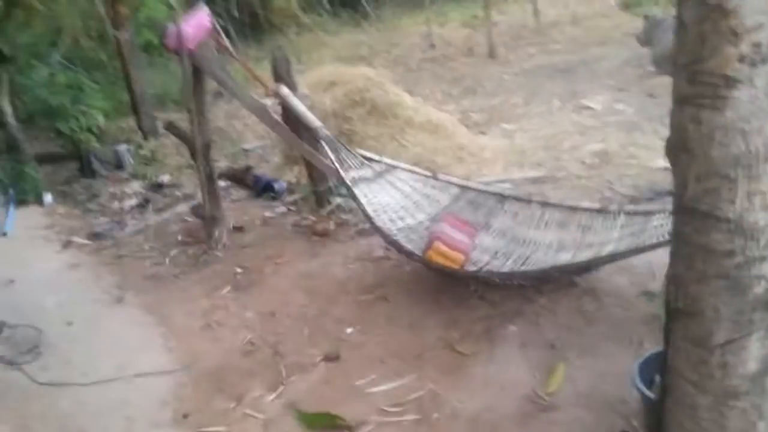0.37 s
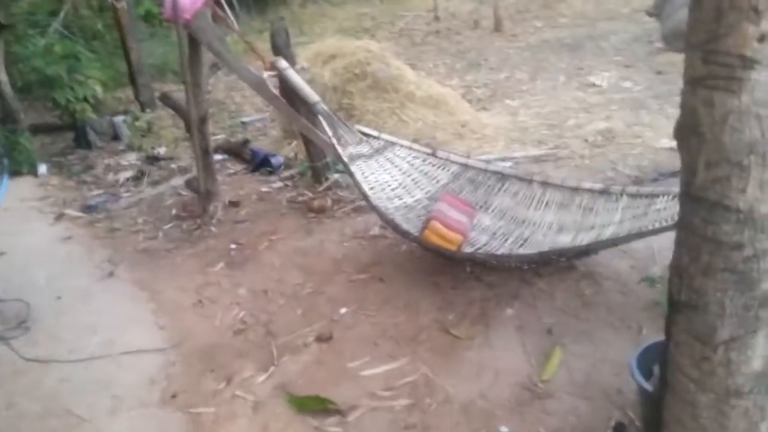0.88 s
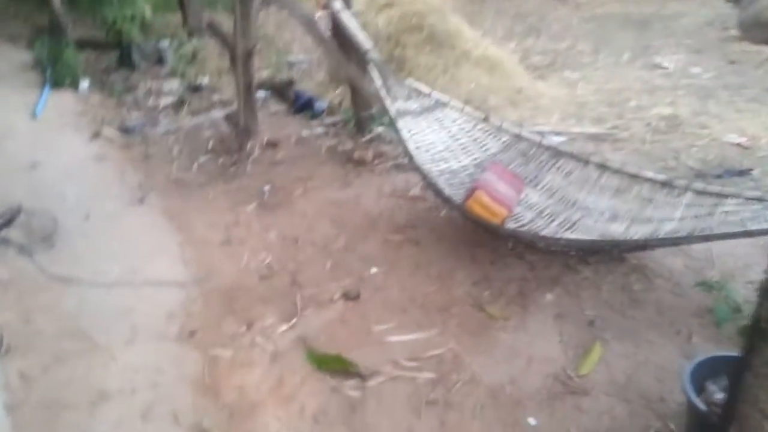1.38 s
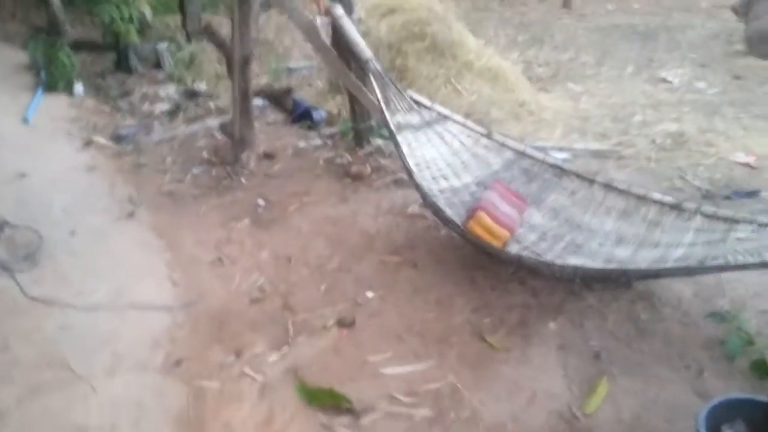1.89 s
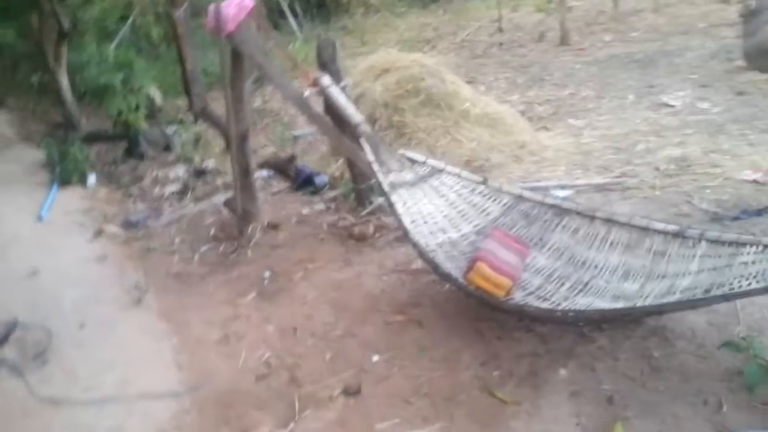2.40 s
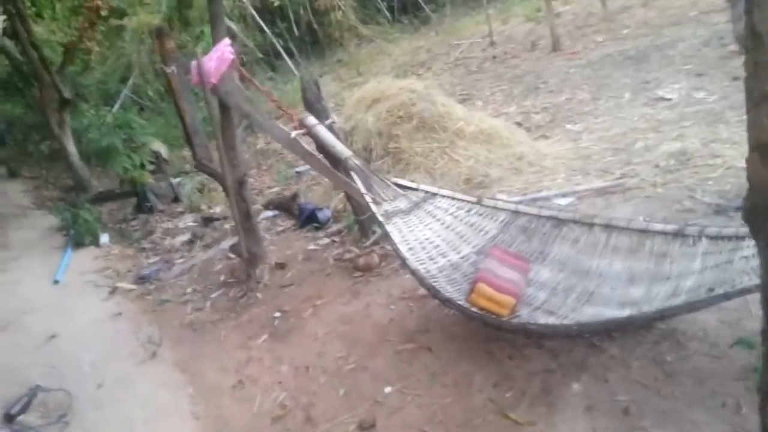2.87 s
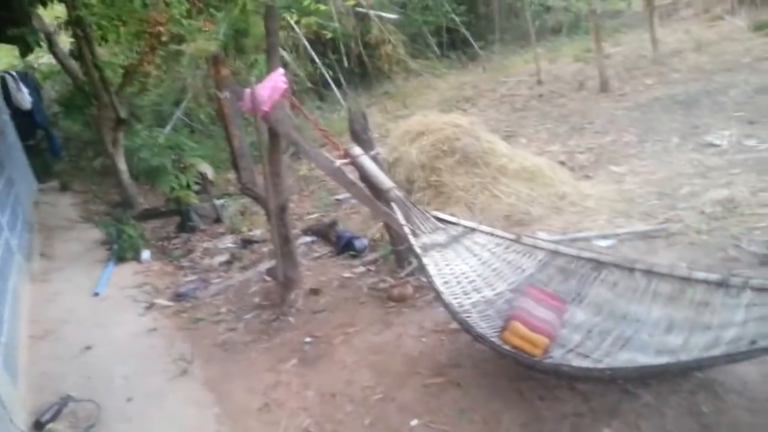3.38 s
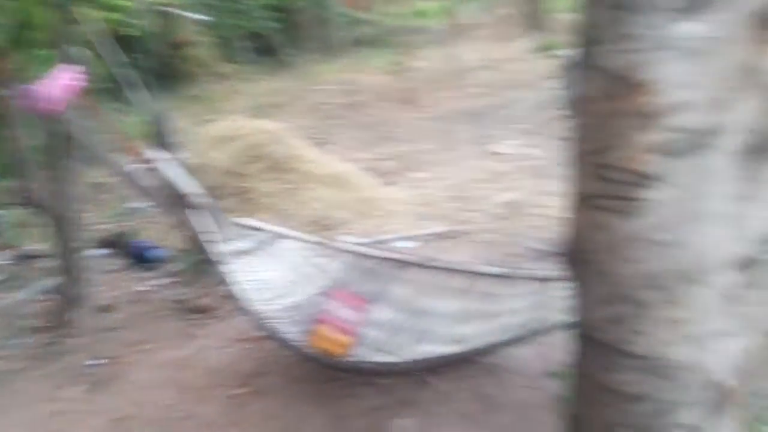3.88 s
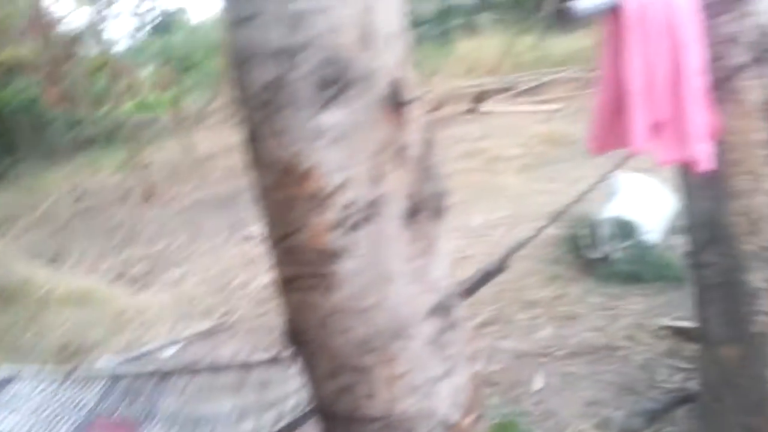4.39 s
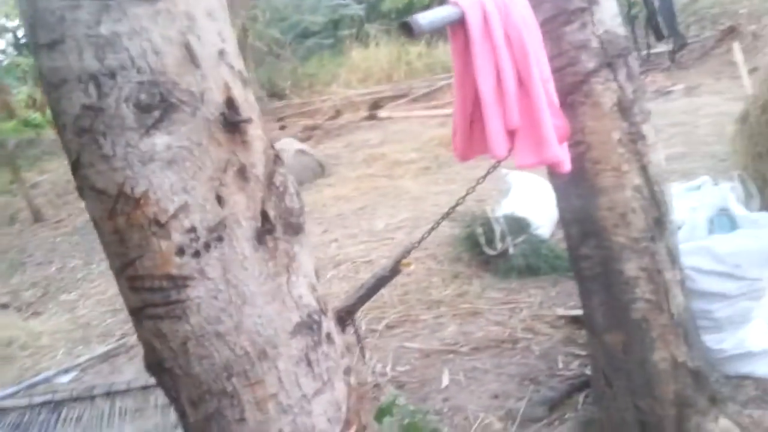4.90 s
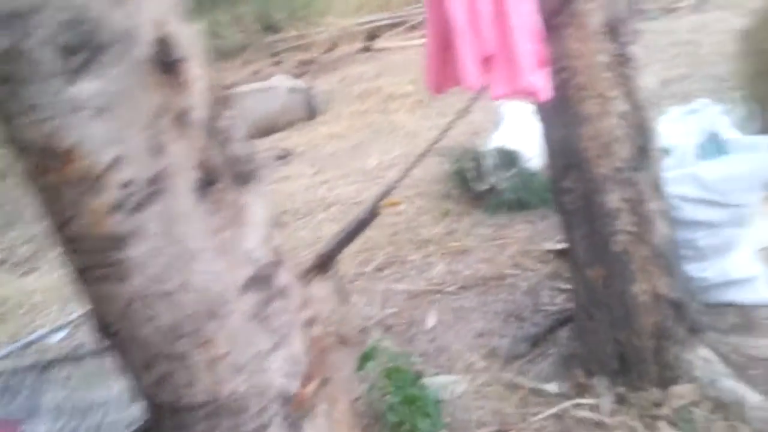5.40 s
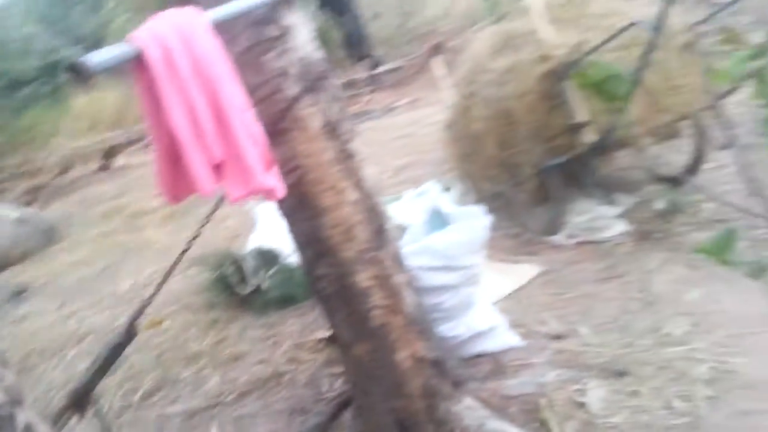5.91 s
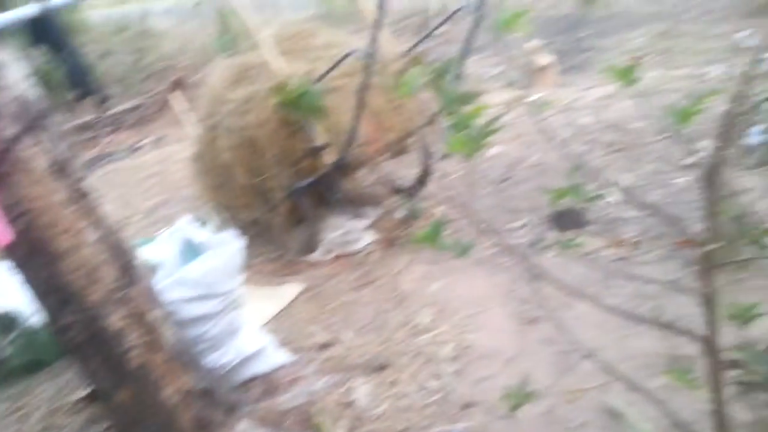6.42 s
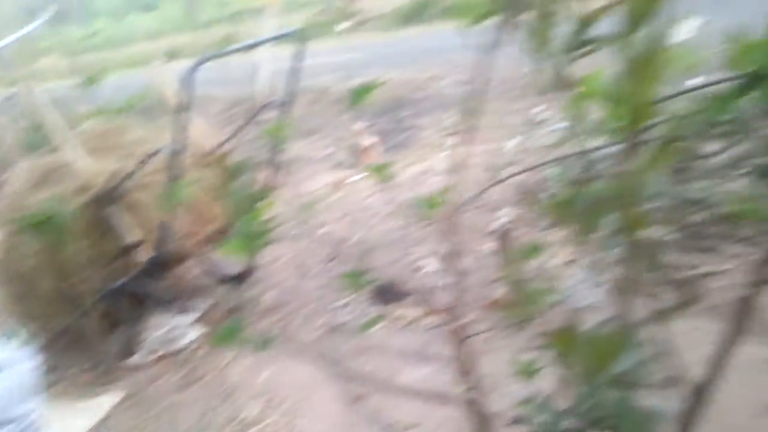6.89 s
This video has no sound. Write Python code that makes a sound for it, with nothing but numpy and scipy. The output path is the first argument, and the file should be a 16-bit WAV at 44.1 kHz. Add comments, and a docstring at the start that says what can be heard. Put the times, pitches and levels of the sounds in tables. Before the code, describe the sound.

Outdoors on dry open ground, close to a small stereo microphone with a quiet, steady airy hiss. From 0 to 0.8 s, soles drag and grind over grit and straw in a dense, overlapping crunch, with brittle twig ticks near 0.1 s and a hard, loud snap at about 0.64 s. A small click follows at 1.0 s. Between 1.1 and 2.5 s the movement is softer: light rustles, small scrapes, dull heel knocks. Firmer crunches come at 2.6 and 3.1 s, then a very crisp bright one at 3.5 s and a woody knock at 3.8 s. Scattered gritty steps continue from 4.3 s, swishing straw around 5.15 s, another crunch at 5.7 s, and quicker shuffles from 6.1 to 7 s. Distant birds give short falling cheeps and thin whistles, mostly after 1 s. A barely audible low tone wavers around 1.8-2.9 s and 4.6-5.5 s.

```python
"""Shuffling on gritty earth

Soles drag, crush grit and stir straw close by: filtered noise with grain bursts and short stone rings. Sharp
close snaps and dull heel knocks are struck decaying sines, heard through two small microphone ports. Far birds
cheep and whistle and a faint low tone comes and goes: gliding sines with wavering level. A quiet band-shaped
noise, the hiss of open country, lies under all."""
import sys
import numpy as np
from scipy import signal
from scipy.io import wavfile

SR = 44100
rng = np.random.default_rng(int(sys.argv[2]) if len(sys.argv) > 2 else 0)


def amplitude_ratio(level_db):
    """Convert a level in decibels to the matching linear amplitude (field) ratio."""
    exponent = np.asarray(level_db, float) / 20
    return 10 ** exponent


def generate_wav(signal):
    """Clip the signal to [-1, 1] and save it as 16-bit WAV at the path in sys.argv[1]."""
    frames = np.transpose(np.atleast_2d(signal))
    scaled = np.clip(frames, -1, 1) * 32767
    pcm = np.round(scaled).astype(np.int16)
    wavfile.write(sys.argv[1], SR, pcm)


N = 310023

BAND_EDGES_HZ = 40 * 2 ** (np.arange(27) / 3)
RIGHT_LAG_S = 0.00023
# likeness of the ports in noise: f/Hz, left-right correlation/1
LIKENESS = [(60, 0.82), (300, 0.57), (700, 0.63), (1400, 0.13), (3000, 0.0)]

# air spectrum: f/Hz, relative density/dB per Hz
AIR_SPECTRUM = [(41, -48), (70, -24), (110, -18), (160, -11), (295, -0.5), (395, -10.5), (494, -4),
                (2330, -5.5), (2980, -4), (3990, -8.5), (13100, -12), (15000, -11)]
AIR_RMS_DB = -63.5

# weight pressing the ground: peak t/s, level in lowest region/dB, 10 dB rise/s, 10 dB fall/s
PRESSES = [(0.01, -64, 0.02, 0.04), (0.098, -54.0, 0.016, 0.199), (0.287, -47.5, 0.09, 0.115),
           (0.571, -52.5, 0.034, 0.108), (0.631, -51.0, 0.004, 0.018), (0.805, -60.5, 0.007, 0.106),
           (1.014, -54.0, 0.054, 0.015), (1.38, -55.5, 0.165, 0.015), (1.617, -59.0, 0.027, 0.015),
           (1.676, -60.5, 0.119, 0.2), (1.723, -48.5, 0.02, 0.022), (2.018, -57.5, 0.2, 0.048),
           (2.094, -60.5, 0.005, 0.076), (2.167, -58.5, 0.017, 0.033), (2.274, -52.5, 0.024, 0.095),
           (2.446, -62.0, 0.092, 0.2), (2.625, -50.0, 0.063, 0.052), (2.885, -66.5, 0.007, 0.021),
           (3.0, -62, 0.015, 0.025), (3.128, -51.5, 0.066, 0.024), (3.207, -64.0, 0.068, 0.025),
           (3.508, -50.0, 0.014, 0.043), (3.55, -50.5, 0.044, 0.027), (3.705, -60.0, 0.069, 0.12),
           (3.821, -50.0, 0.005, 0.021), (3.855, -61.0, 0.148, 0.015), (4.112, -56.0, 0.021, 0.025),
           (4.213, -67.5, 0.039, 0.02), (4.326, -53.0, 0.004, 0.041), (4.403, -57.0, 0.02, 0.057),
           (4.83, -56.0, 0.054, 0.066), (5.234, -58.5, 0.039, 0.044), (5.296, -60.0, 0.053, 0.036),
           (5.349, -66.0, 0.023, 0.015), (5.49, -64.5, 0.028, 0.019), (5.635, -60, 0.015, 0.03),
           (5.721, -47.5, 0.031, 0.031), (5.851, -53.5, 0.005, 0.029), (6.105, -64.5, 0.069, 0.017),
           (6.155, -54.0, 0.013, 0.132), (6.24, -58, 0.03, 0.03), (6.305, -58, 0.01, 0.03),
           (6.45, -57.0, 0.005, 0.145), (6.56, -60, 0.01, 0.025), (6.654, -52.0, 0.021, 0.021),
           (6.782, -64.0, 0.015, 0.028), (6.927, -50.0, 0.031, 0.048), (6.99, -59, 0.015, 0.03)]
# sole dragging on packed earth: peak t/s, level in scrape region/dB, 10 dB rise/s, 10 dB fall/s,
# resonance f/Hz
DRAGS = [(0.175, -44.0, 0.039, 0.027, 1690), (0.215, -47.0, 0.002, 0.156, 1540),
         (0.279, -42.5, 0.021, 0.019, 1760), (0.308, -40.0, 0.029, 0.025, 1880),
         (0.37, -50.5, 0.003, 0.108, 1580), (0.555, -49.0, 0.033, 0.169, 1720),
         (0.644, -48.5, 0.023, 0.016, 1380), (0.682, -51.5, 0.002, 0.022, 1610),
         (0.98, -60.0, 0.013, 0.053, 1570), (1.24, -56.5, 0.021, 0.013, 1550),
         (1.288, -57.0, 0.002, 0.036, 1840), (1.359, -59.0, 0.023, 0.031, 1340),
         (1.687, -60.0, 0.088, 0.2, 1310), (1.723, -53.0, 0.018, 0.014, 1300),
         (1.794, -53.0, 0.004, 0.012, 1830), (1.966, -56.0, 0.004, 0.012, 1360),
         (2.015, -58.0, 0.006, 0.029, 1330), (2.203, -59.5, 0.049, 0.039, 1500),
         (2.281, -49.5, 0.004, 0.022, 1330), (2.335, -56.5, 0.061, 0.148, 1450),
         (2.636, -47.5, 0.028, 0.025, 1450), (3.069, -53.5, 0.036, 0.033, 1330),
         (3.118, -50.5, 0.004, 0.012, 1300), (3.219, -64.5, 0.023, 0.013, 1290),
         (3.546, -53.5, 0.023, 0.024, 1320), (3.757, -55.5, 0.015, 0.012, 1540),
         (3.825, -50.0, 0.005, 0.015, 1220), (4.11, -60, 0.015, 0.02, 1430),
         (4.319, -55.5, 0.004, 0.024, 1430), (4.391, -48.0, 0.003, 0.012, 1390),
         (5.181, -51.5, 0.035, 0.012, 1780), (5.298, -53.5, 0.004, 0.023, 1750),
         (5.713, -46.5, 0.004, 0.036, 1300), (6.074, -59.5, 0.006, 0.029, 1650),
         (6.148, -46.5, 0.004, 0.08, 1310), (6.24, -54, 0.02, 0.03, 1360),
         (6.457, -51.5, 0.006, 0.034, 1320), (6.552, -56.0, 0.002, 0.035, 1330),
         (6.645, -48.0, 0.004, 0.023, 1300), (6.771, -51.0, 0.004, 0.02, 1630),
         (6.893, -44.0, 0.006, 0.012, 1400), (6.986, -54.5, 0.075, 0.02, 1580)]
# sole crushing grit: peak t/s, level in grit region/dB, 10 dB rise/s, 10 dB fall/s, resonance f/Hz
CRUSHES = [(0.107, -41.5, 0.006, 0.024, 2450), (0.177, -37.5, 0.032, 0.015, 2760),
           (0.273, -41.0, 0.049, 0.186, 3330), (0.306, -38.5, 0.06, 0.033, 3450),
           (0.378, -45, 0.006, 0.02, 3290), (0.436, -47.5, 0.164, 0.025, 3210),
           (0.561, -40.5, 0.028, 0.061, 2690), (0.617, -43.0, 0.04, 0.053, 3480),
           (0.706, -46.5, 0.076, 0.028, 4980), (0.741, -47.5, 0.017, 0.016, 2410),
           (0.829, -49.5, 0.046, 0.019, 4220), (0.96, -48.5, 0.013, 0.015, 5410),
           (1.011, -51.5, 0.127, 0.029, 5250), (1.18, -56.0, 0.042, 0.02, 4070),
           (1.249, -49.5, 0.071, 0.082, 4530), (1.387, -57.5, 0.2, 0.017, 3670),
           (1.595, -59.5, 0.054, 0.097, 3450), (1.649, -50.5, 0.006, 0.092, 4670),
           (1.728, -55.5, 0.028, 0.025, 3290), (1.785, -55.5, 0.015, 0.015, 2630),
           (1.883, -55.0, 0.093, 0.052, 5630), (1.968, -52, 0.003, 0.03, 5200),
           (1.985, -45.5, 0.016, 0.037, 4360), (2.029, -52.5, 0.038, 0.021, 4620),
           (2.215, -56.5, 0.089, 0.026, 2520), (2.289, -55.0, 0.09, 0.098, 3010),
           (2.348, -58.0, 0.03, 0.02, 4310), (2.442, -66.0, 0.006, 0.067, 2880),
           (2.614, -43.5, 0.032, 0.033, 4160), (2.719, -62.0, 0.033, 0.025, 2770),
           (2.953, -58.0, 0.007, 0.117, 4770), (3.066, -47.5, 0.042, 0.018, 4640),
           (3.112, -41.0, 0.056, 0.049, 4790), (3.443, -57.0, 0.016, 0.033, 4330),
           (3.486, -46.5, 0.021, 0.024, 4430), (3.511, -32.5, 0.009, 0.017, 4350),
           (3.545, -42.5, 0.015, 0.032, 4810), (3.576, -45.5, 0.005, 0.041, 4840),
           (3.715, -51.0, 0.043, 0.073, 5260), (3.764, -51.0, 0.029, 0.019, 4000),
           (3.834, -53.0, 0.022, 0.051, 5030), (4.101, -53.5, 0.022, 0.036, 4810),
           (4.315, -55.5, 0.006, 0.13, 3620), (4.403, -45.0, 0.015, 0.033, 4040),
           (4.517, -45.0, 0.034, 0.026, 5380), (4.695, -61.5, 0.006, 0.129, 4220),
           (4.794, -50.5, 0.014, 0.057, 3750), (4.828, -44.0, 0.037, 0.036, 4370),
           (4.873, -56.0, 0.006, 0.022, 3390), (4.943, -58.0, 0.013, 0.022, 2780),
           (5.104, -52.0, 0.003, 0.092, 4090), (5.137, -44.5, 0.015, 0.075, 4850),
           (5.172, -46.5, 0.025, 0.06, 4650), (5.203, -45.0, 0.034, 0.043, 4630),
           (5.299, -52.0, 0.014, 0.046, 2790), (5.448, -58.0, 0.029, 0.187, 3180),
           (5.482, -56, 0.03, 0.035, 3900), (5.648, -44.0, 0.024, 0.025, 5230),
           (5.67, -49.5, 0.028, 0.015, 4750), (5.687, -50.5, 0.028, 0.133, 4180),
           (5.703, -40.0, 0.003, 0.034, 4300), (5.861, -52.5, 0.015, 0.044, 3110),
           (6.005, -65.0, 0.022, 0.107, 3000), (6.092, -54.5, 0.023, 0.023, 4250),
           (6.171, -47.5, 0.022, 0.078, 4850), (6.211, -48.0, 0.006, 0.089, 4660),
           (6.24, -45.0, 0.024, 0.035, 4660), (6.4, -58.5, 0.131, 0.037, 3120),
           (6.459, -55.5, 0.018, 0.077, 2790), (6.556, -51, 0.003, 0.03, 4040),
           (6.571, -47.0, 0.02, 0.04, 3890), (6.651, -43.5, 0.005, 0.034, 3980),
           (6.684, -54.0, 0.003, 0.017, 4030), (6.773, -54.5, 0.013, 0.101, 2680),
           (6.895, -46.0, 0.017, 0.038, 3890), (6.956, -48.0, 0.006, 0.089, 4160)]
# loose straw swishing: peak t/s, level in top region/dB, 10 dB rise/s, 10 dB fall/s
SWISHES = [(0.244, -45.0, 0.019, 0.126), (0.328, -47.0, 0.047, 0.014), (0.547, -53.5, 0.017, 0.066),
           (0.614, -49.5, 0.062, 0.03), (0.701, -52.5, 0.053, 0.018), (0.793, -55.5, 0.006, 0.057),
           (0.973, -57.0, 0.078, 0.06), (1.229, -54.0, 0.014, 0.025), (1.599, -61.5, 0.015, 0.013),
           (1.673, -55.5, 0.03, 0.029), (1.858, -59.0, 0.016, 0.065), (1.968, -52.5, 0.002, 0.042),
           (2.013, -55.0, 0.022, 0.027), (2.216, -63.5, 0.005, 0.051), (3.101, -49.5, 0.048, 0.031),
           (3.202, -62.5, 0.023, 0.023), (3.486, -55.5, 0.013, 0.019), (3.588, -56.0, 0.018, 0.049),
           (3.709, -52.0, 0.02, 0.039), (3.833, -50.5, 0.005, 0.028), (4.535, -59.0, 0.02, 0.021),
           (4.845, -53.0, 0.007, 0.018), (5.103, -52.0, 0.002, 0.074), (5.13, -48.0, 0.006, 0.066),
           (5.174, -46.0, 0.025, 0.022), (5.308, -61.0, 0.015, 0.023), (5.664, -57.0, 0.022, 0.018),
           (6.191, -59.0, 0.019, 0.031), (6.556, -52.5, 0.003, 0.06), (6.58, -52.0, 0.003, 0.015),
           (6.91, -60.0, 0.007, 0.024), (6.957, -50.0, 0.004, 0.114)]
# limits between weight, scrape, grit and straw regions: f/Hz
REGION_EDGES_HZ = [1050, 2100, 7000]
# stirred by a crush: level re grit at a middling crush/dB, loss per dB of crush/dB
WEIGHT_LAW, SCRAPE_LAW, STRAW_LAW = (-15, 0.4), (-8.5, 0.2), (-6.5, 0.3)
MIDDLING_CRUSH_DB = -50
# base spectrum of the feet: f/Hz, relative density/dB per Hz
CRUNCH_SPECTRUM = [(24, -63), (40, -19), (125, -18.5), (466, -1), (824, -0.5), (1290, -4.5), (2520, -3),
                   (4230, -5), (12900, -11.5), (15000, -28)]
GRIT_PEAK_DB, GRIT_WIDTH_OCTAVES = 6.0, 0.3
SCRAPE_PEAK_DB, SCRAPE_WIDTH_OCTAVES = 5.0, 0.25
GRAINS_PER_S, GRAIN_DECAY_S, GRAIN_SPREAD_DB, SMOOTH_SHARE = 700, 0.0018, 2.5, 0.9
PEBBLES_PER_S, PEBBLE_T60_CYCLES, PEBBLE_DB = 25, 27, -11    # rate per band
# place of the feet in the treble: t/s, left-right/dB
FEET_PAN = [(0.05, 3), (0.12, 12), (0.23, 0), (0.31, -4), (0.47, 7), (0.72, 1), (1.1, 3.5), (2.62, 4),
            (2.8, 0), (3.11, 8), (3.3, 2), (3.45, 6.5), (4.29, 2), (4.8, 3), (5.07, -3.5), (5.38, 3),
            (6.77, 2.5), (7.03, -6)]
# how far lower bands follow that place: t/s, share/1
MIDDLE_FOLLOWS = [(0.6, 1.1), (1.0, 0.3), (3.0, 0.15)]

# sharp close snaps: t/s, level/dB, dull modes/dB, bright modes/dB, left-right/dB
SNAPS = [(0.1031, -28, 0.0, -14.0, 9), (0.106, -24, 1.5, -14.0, 16), (.1075, -30.5, 9.5, -10.5, 9),
         (.1180, -25.5, -8, -22, 21), (0.125, -24, 2, -13, 6.5), (0.3795, -29, 4.5, -13, 26),
         (0.6362, -11, 5.5, -3, 13), (0.655, -18.5, 5.5, -6, -5), (1.0032, -20, -16, -3, 8),
         (1.0049, -26, 0, -10, 3), (3.4974, -37, -10.0, 10, 2), (3.5012, -31, -10.0, 3, 4)]
# snap modes: f/Hz, level re snap/dB, t60/s (ring() floors it at 1 ms)
SNAP_MODES = [(523, -36, 0.023), (1245, -13.5, .010), (1860, -6, 0.0039), (2900, 3.5, 0.0013),
              (4580, 1, 0.001), (7300, 4.5, 0.00086), (9700, -14, 0.00067)]

# cheeps whose pitch moves at once, then levels out: t/s, length/s, from f/Hz, to f/Hz, level/dB
CHEEPS = [(1.22, .07, 3450, 3090, -51), (1.74, .05, 3260, 3020, -54), (4.335, .08, 3750, 3260, -51),
          (4.79, .07, 3560, 2930, -48), (5.45, .07, 3500, 2880, -50), (6.36, .06, 3170, 2860, -55),
          (6.65, .03, 2800, 2960, -53), (6.885, .035, 3150, 2920, -56)]
# thin even slides of the same bird: t/s, length/s, from f/Hz, to f/Hz, level/dB
SLIDES = [(2.1, .1, 3620, 3390, -65), (4.15, .11, 3110, 3250, -74), (4.308, .03, 3980, 3750, -58),
          (4.405, .042, 3280, 2880, -53), (4.7, .092, 4040, 3520, -58), (5.41, .045, 3750, 3470, -61),
          (5.51, .05, 2900, 2690, -61), (6.29, .07, 3700, 3200, -62)]
# second, lower whistler: t/s, length/s, from f/Hz, to f/Hz, level/dB
WHISTLES = [(1.1, .085, 2860, 2530, -68), (1.33, .35, 2530, 2920, -72), (1.775, .037, 2300, 1640, -55),
            (1.82, .13, 2900, 3030, -72), (2.1, .08, 2880, 2500, -66), (2.32, .25, 1590, 1550, -66),
            (2.65, .09, 2890, 2540, -69), (3.04, .09, 1310, 1280, -56), (3.13, .08, 2860, 2520, -62),
            (3.84, .08, 2750, 2520, -70), (4.35, .08, 2850, 2490, -60)]

# heel knocks: t/s, level/dB, f/Hz, t60/s
KNOCKS = [(1.349, -48.5, 500, 0.067), (1.718, -36, 610, 0.022), (2.013, -45.5, 483, 0.024),
          (2.284, -41.5, 533, 0.048), (2.995, -42.5, 342, 0.022), (3.094, -45, 477, 0.045),
          (3.821, -31, 646, 0.037), (4.322, -41.5, 623, 0.025), (5.633, -50, 727, 0.047),
          (5.854, -37.5, 457, 0.02), (6.3, -47.5, 762, 0.06), (6.455, -43.5, 786, 0.06)]
BLOW_HIGHPASS_HZ = 256

# low tone: t/s, length/s, from f/Hz, to f/Hz, level/dB
LOW_TONE = [(1.75, 1.15, 293, 293, -70), (4.55, .5, 290, 289, -72.5), (5.1, .45, 287, 286, -68)]


def rms_one(x):
    """Scale to rms 1."""
    return x / np.sqrt(np.mean(x ** 2) + 1e-20)


def slow_times():
    """Time in s at every 32nd sample, the slow control rate."""
    return np.arange(0, N + 32, 32) / SR


def in_time(rows):
    """Curve in time, read at the slow rate."""
    s, value = np.transpose(rows)
    return np.interp(slow_times(), s, value)


def full_rate(slow):
    """From every 32nd sample to every sample."""
    return np.interp(np.arange(N) / 32, np.arange(len(slow)), slow)


def at_hz(points, hz):
    """Read a spectrum on a log frequency axis."""
    point_hz, value = np.transpose(points)
    return np.interp(np.log(hz), np.log(point_hz), value)


def drift(pole_hz):
    """Noise through a double low-pass pole: slow chance of spread 1 at the slow rate."""
    r = np.exp(-64 * np.pi * pole_hz / SR)
    noise = rng.standard_normal(N // 32 + 2002)
    settled = signal.lfilter([1], [1, -2 * r, r * r], noise)[2000:]
    return rms_one(settled)[:len(slow_times())]


def ring(clicks, hz, t60_s):
    """Two-pole resonator: a unit click starts a decaying sine of height 1."""
    r = amplitude_ratio(-60 / (max(t60_s, 0.001) * SR))
    w = 2 * np.pi * hz / SR
    return signal.lfilter([0, np.sin(w)], [1, -2 * r * np.cos(w), r * r], clicks + 1e-18)


def both_ports(x, pan_db, right_lag_s):
    """One source at two microphone ports: level and arrival time differ."""
    late = np.interp(np.arange(N) - right_lag_s * SR, np.arange(N), x)
    return np.array([x * amplitude_ratio(pan_db / 2), late * amplitude_ratio(-pan_db / 2)])


def bands(white):
    """Third-octave stereo noise, unit power per Hz: ports alike in the bass, unrelated in the treble."""
    lag = round(RIGHT_LAG_S * SR)
    for k, (low, high) in enumerate(zip(BAND_EDGES_HZ, BAND_EDGES_HZ[1:])):
        bandpass = signal.butter(2, [low, high], "band", fs=SR, output="sos")
        mid, side = signal.sosfilt(bandpass, white[k % 2])    # neighbours use unrelated noise
        hz = np.sqrt(low * high)
        alike = at_hz(LIKENESS, hz)
        mid = np.sqrt((1 + alike) / 2) * mid
        side = np.sqrt((1 - alike) / 2) * side
        yield hz, np.array([mid + side, np.roll(mid - side, lag)]) * np.sqrt(SR / 2)


def air(patchy_db=1.5):
    """Far leaves, road and device hiss: shaped noise, each band drifting slowly in level."""
    out = 0
    for hz, band in bands(rng.standard_normal((2, 2, N))):
        out = out + band * full_rate(amplitude_ratio(at_hz(AIR_SPECTRUM, hz) + patchy_db * drift(1.4)))
    return amplitude_ratio(AIR_RMS_DB) * rms_one(out)


def swells(rows):
    """Power of each event at the slow rate: straight rise and fall in dB."""
    s, db, rise_s, fall_s = np.transpose(rows)[:4, :, None]
    since = slow_times() - s
    below_db = 10 * np.where(since < 0, -since / rise_s, since / fall_s)
    return amplitude_ratio(2 * np.maximum(db - below_db, -150))


def stirred(grit_db, rows, law):
    """Level/dB of a region: its own events plus what a crush stirs, relatively less when harder."""
    db, loss = law
    induced_db = grit_db + db - loss * (grit_db - MIDDLING_CRUSH_DB)
    return 10 * np.log10(amplitude_ratio(2 * induced_db) + swells(rows).sum(0))


def sole():
    """Levels/dB of weight, scrape, grit and straw, coupled through the crushes."""
    grit_db = 10 * np.log10(swells(CRUSHES).sum(0))
    weight_db = stirred(grit_db, PRESSES, WEIGHT_LAW)
    scrape_db = stirred(grit_db, DRAGS, SCRAPE_LAW)
    straw_db = stirred(grit_db, SWISHES, STRAW_LAW)
    return weight_db, scrape_db, grit_db, straw_db


def loudest_hz(rows):
    """Power-weighted log mean of the resonances, leaning to the loudest event."""
    power = swells(rows)
    return np.exp(np.log(np.array(rows)[:, 4]) @ power / power.sum(0))


def resonance(hz, peak_hz, peak_db, width_octaves):
    """Gain/dB of a bell on a log frequency axis."""
    return peak_db * np.exp(-0.5 * (np.log2(hz / peak_hz) / width_octaves) ** 2)


def pebble(hz):
    """Stones and stalks knocked loose ring briefly, unlike on the two ports; unit power per Hz."""
    at = rng.integers(0, N, round(PEBBLES_PER_S * N / SR))
    chance = rng.normal(0, 1, (len(at), 4))
    out = np.zeros((2, N))
    for detune in (0.94, 1.06):
        clicks = np.zeros((2, N))
        chosen = (chance[:, 3] > 0) == (detune > 1)
        clicks[:, at[chosen]] = (chance[chosen, 1:3] * amplitude_ratio(1.7 * chance[chosen, :1])).T
        out += ring(clicks, detune * hz, PEBBLE_T60_CYCLES / hz)
    return rms_one(out) * np.sqrt(hz * (2 ** (1 / 6) - 2 ** (-1 / 6)))


def grainy_noise():
    """White noise: a smooth drag plus grit cracking in short decaying bursts."""
    crack_db = GRAIN_SPREAD_DB * np.minimum(rng.exponential(1, N), 5)
    cracks = (rng.random(N) < GRAINS_PER_S / SR) * amplitude_ratio(crack_db)
    bursts = rms_one(signal.lfilter([1], [1, -np.exp(-1 / (GRAIN_DECAY_S * SR))], cracks))
    envelope = np.sqrt(SMOOTH_SHARE + (1 - SMOOTH_SHARE) * bursts ** 2)
    return rng.standard_normal((2, 2, N)) * envelope


def feet(patchy_db=1.8):
    """Grainy noise and pebbles in bands; moving resonances and four region levels colour each moment."""
    levels_db = sole()
    treble_pan = in_time(FEET_PAN)
    middle_pan = in_time(MIDDLE_FOLLOWS) * treble_pan
    hz = np.sqrt(BAND_EDGES_HZ[1:] * BAND_EDGES_HZ[:-1])[:, None]
    shape_db = at_hz(CRUNCH_SPECTRUM, hz)
    shape_db = shape_db + resonance(hz, loudest_hz(CRUSHES), GRIT_PEAK_DB, GRIT_WIDTH_OCTAVES)
    shape_db = shape_db + resonance(hz, loudest_hz(DRAGS), SCRAPE_PEAK_DB, SCRAPE_WIDTH_OCTAVES)
    power = amplitude_ratio(2 * shape_db) * np.diff(BAND_EDGES_HZ)[:, None]
    region_of = np.searchsorted(REGION_EDGES_HZ, hz[:, 0])
    out = 0
    for k, (centre_hz, band) in enumerate(bands(grainy_noise())):
        region = region_of[k]
        db = shape_db[k] - 10 * np.log10(power[region_of == region].sum(0)) + levels_db[region]
        db = db + 10 * np.log10(2 / (1 + at_hz(LIKENESS, centre_hz)))    # unlike ports sum weakly
        db = db - 0.4 + patchy_db * drift(20.8)    # crunch lands unevenly over the bands
        pan_share = np.interp(np.log(centre_hz), np.log([400, 1200]), [0.3, 1])
        half_pan = pan_share * (middle_pan if centre_hz < 4300 else treble_pan) / 2
        if 900 < centre_hz < 9000:
            band = band + amplitude_ratio(PEBBLE_DB) * pebble(centre_hz)
        out = out + band * [full_rate(amplitude_ratio(db + half_pan)), full_rate(amplitude_ratio(db - half_pan))]
    return out


def snaps():
    """Each snap strikes the same modes, with strengths of its own on each port."""
    out = np.zeros((2, N))
    strength_db = rng.normal(0, 1.85, (len(SNAPS), len(SNAP_MODES), 2, 1))
    click = np.eye(1, 1500)[0]
    for k, (hz, level_db, t60_s) in enumerate(SNAP_MODES):
        mode = (-1) ** k * ring(click, hz, t60_s)
        for (s, db, dull_db, bright_db, pan_db), own_db in zip(SNAPS, strength_db):
            colour_db = dull_db if hz < 2100 else bright_db if hz > 5600 else 0
            ports_db = np.array([[pan_db], [-pan_db]]) / 2 + own_db[k]
            at = round(s * SR)
            out[:, at:at + len(click)] += mode * amplitude_ratio(db + level_db + colour_db + ports_db)
    return out


def tones(notes, bend, peak_at, start_db, end_db, waver, edge_s, flutter_db):
    """Soft-edged sines that glide and swell; moving air makes pitch and level waver."""
    out = np.zeros(N)
    wobble = full_rate(drift(40))
    flutter = full_rate(flutter_db * drift(40))
    for s, length_s, first_hz, last_hz, db in notes:
        at = np.arange(round(s * SR), round((s + length_s) * SR))
        done = np.linspace(0, 1, len(at))
        hz = last_hz + (first_hz - last_hz) * (1 - done) ** bend
        swell_db = np.interp(done, [0, peak_at, 1], [start_db, 0, end_db])
        edge = np.clip(np.minimum(done, 1 - done) * length_s / edge_s, 0, 1)
        phase = 2 * np.pi * np.cumsum(hz * (1 + waver * wobble[at])) / SR
        out[at] += np.sqrt(2) * amplitude_ratio(db + swell_db + flutter[at]) * edge * np.sin(phase)
    return out


def birds():
    """Far gliding calls, each with one faint echo from a wall."""
    out = 0
    # notes, bend, swell peak/1, start/dB, end/dB, left-right/dB, right lag/s
    for notes, bend, peak_at, start_db, end_db, pan_db, lag_s in (
            (CHEEPS, 4, 0.5, -5, -9, -1.5, -0.00006),
            (SLIDES, 1, 0.85, -7, -1, -1.5, -0.00006),
            (WHISTLES, 1, 0.5, -2, -3, -1.0, 0)):
        call = tones(notes, bend, peak_at, start_db, end_db, waver=0.004, edge_s=0.006, flutter_db=2.5)
        echo = 0.25 * np.roll(call, round(0.021 * SR))
        out = out + both_ports(call + echo, pan_db, lag_s)
    return out


def knocks():
    """A heel settles in four soft pushes that ring two modes of the packed earth."""
    out = np.zeros(N)
    for (s, db, hz, t60_s), chance in zip(KNOCKS, rng.random((len(KNOCKS), 8))):
        clicks = np.zeros(4000)
        push_s = np.cumsum(0.002 + 0.005 * chance[:4] * [0, 1, 1, 1])
        clicks[(push_s * SR).astype(int)] = amplitude_ratio(db - 11.0 * chance[4:]) * [1, -1, 1, 1]
        thud = ring(clicks, hz, t60_s) + 0.5 * ring(clicks, 1.715 * hz, 0.83 * t60_s)
        at = round((s - 0.003) * SR)
        out[at:at + 4000] += signal.lfilter([0.3], [1, -0.7], thud)    # soft contact
    return both_ports(out, 1.4, RIGHT_LAG_S)


def low_tone():
    """Far faint sine, swelling and fading with slight waver."""
    tone = tones(LOW_TONE, bend=1, peak_at=0.3, start_db=-9, end_db=-11,
                 waver=0.0021, edge_s=0.045, flutter_db=4.0)
    return both_ports(tone, -1.6, 0)


def scene():
    """Sum of all sources; the small ports cut the bass of snaps and knocks."""
    highpass = signal.butter(2, BLOW_HIGHPASS_HZ, "high", fs=SR, output="sos")
    blows = signal.sosfilt(highpass, snaps() + knocks())
    return air() + feet() + blows + birds() + low_tone()


def band_limit(x):
    """A steep low-pass at the top of the band."""
    return signal.sosfilt(signal.butter(12, 15830, fs=SR, output="sos"), x)


def record(dry):
    """Adds a small constant converter offset."""
    mix = dry - 0.0003
    return band_limit(mix)


dry = scene()
out = record(dry)
generate_wav(out)
```